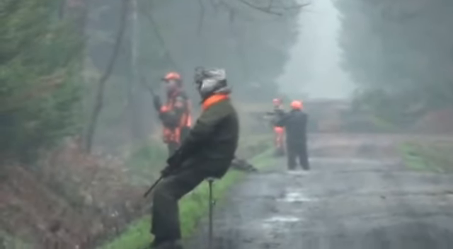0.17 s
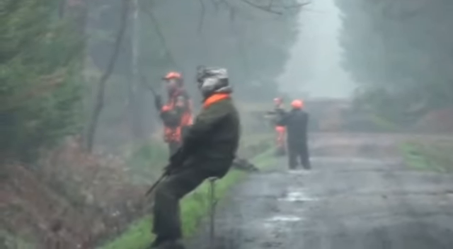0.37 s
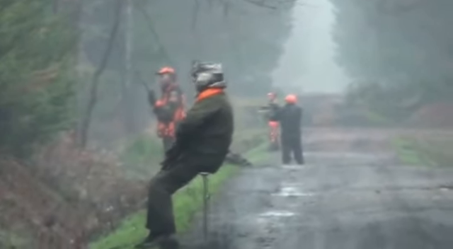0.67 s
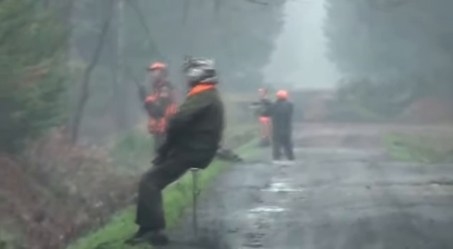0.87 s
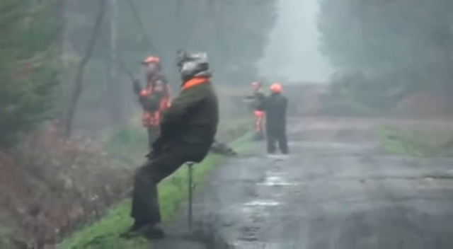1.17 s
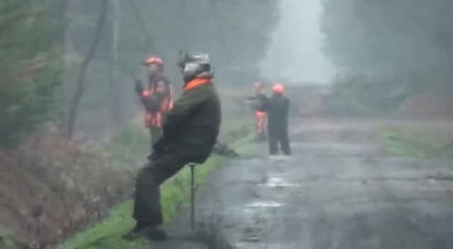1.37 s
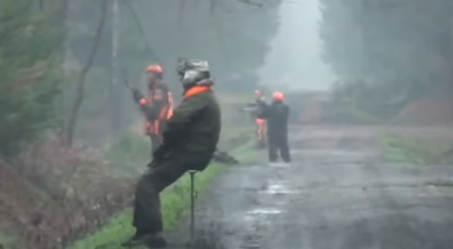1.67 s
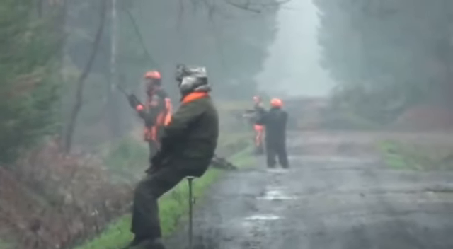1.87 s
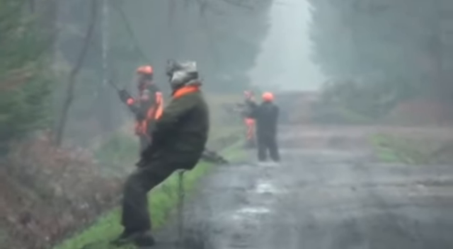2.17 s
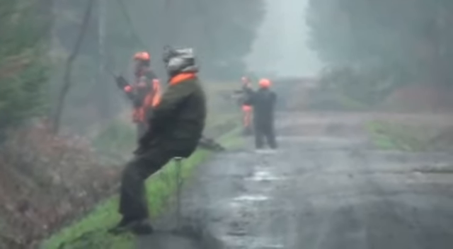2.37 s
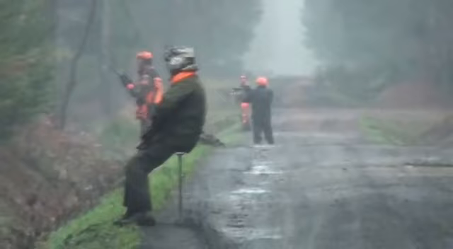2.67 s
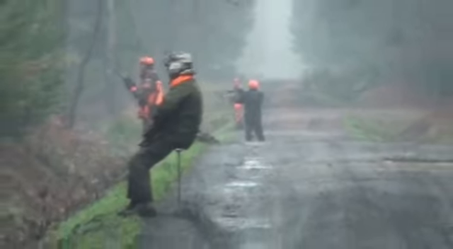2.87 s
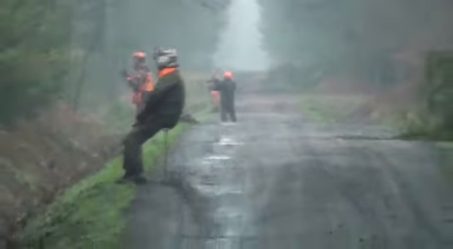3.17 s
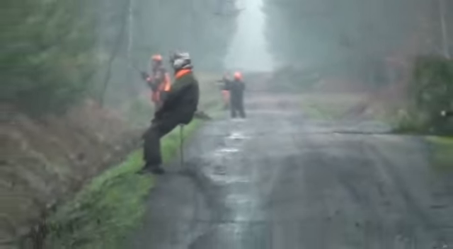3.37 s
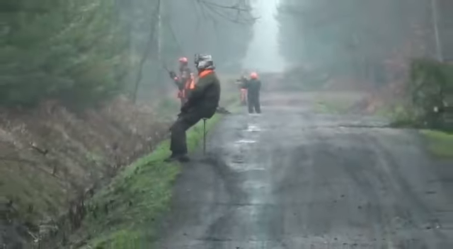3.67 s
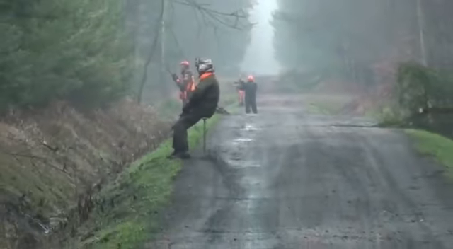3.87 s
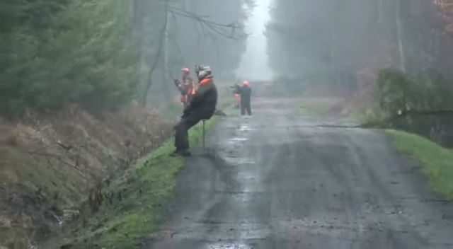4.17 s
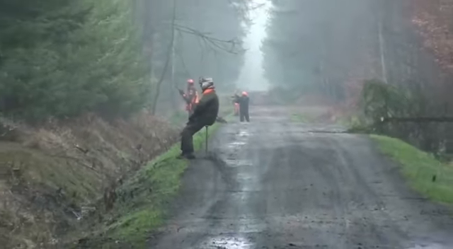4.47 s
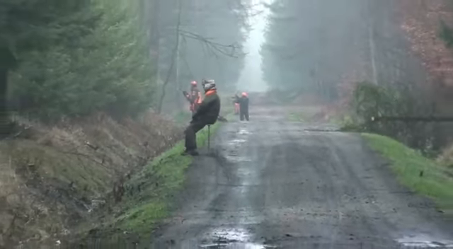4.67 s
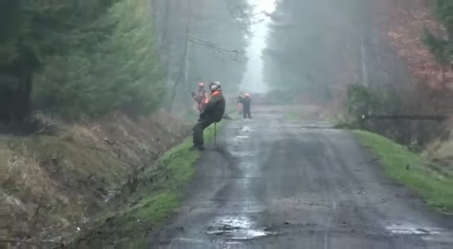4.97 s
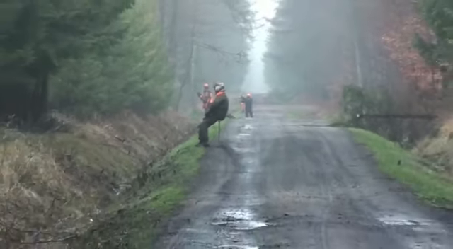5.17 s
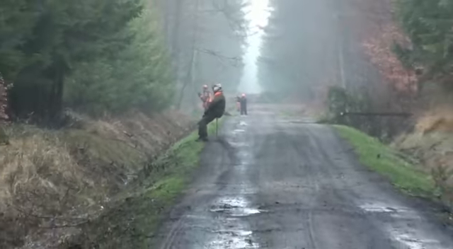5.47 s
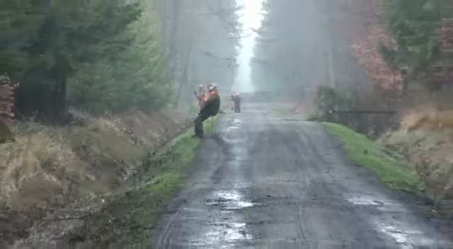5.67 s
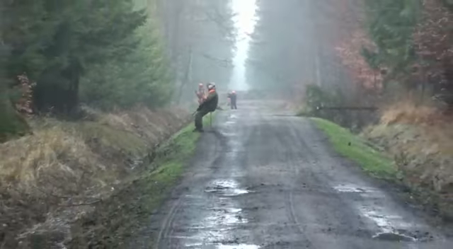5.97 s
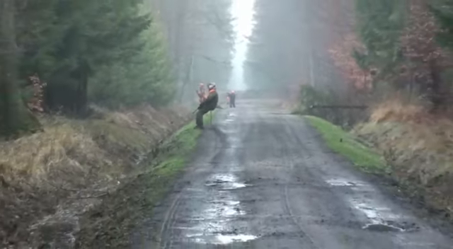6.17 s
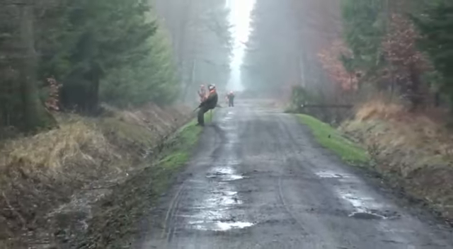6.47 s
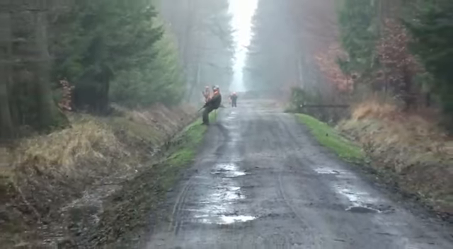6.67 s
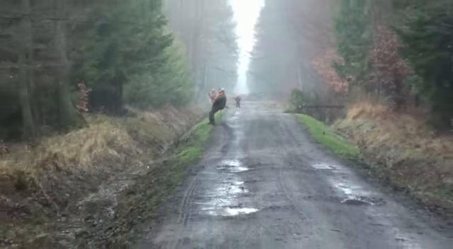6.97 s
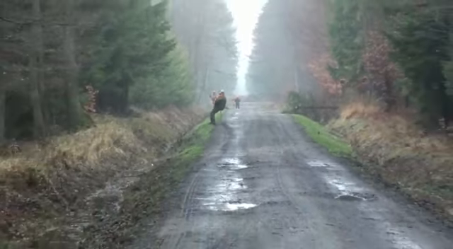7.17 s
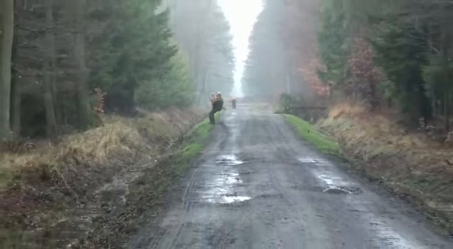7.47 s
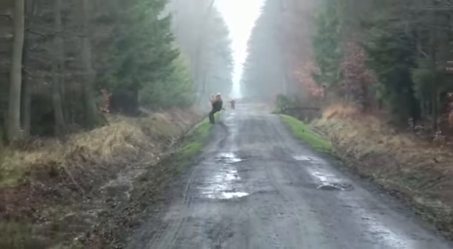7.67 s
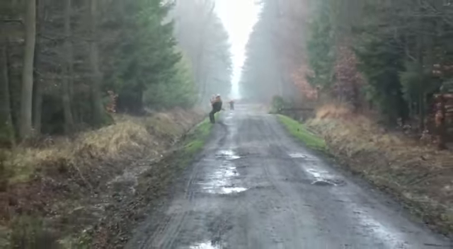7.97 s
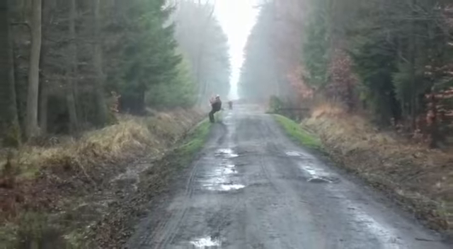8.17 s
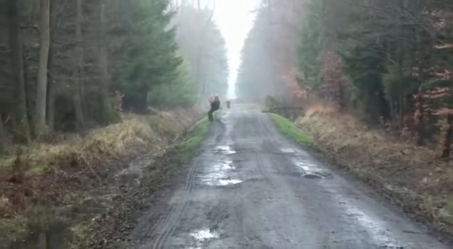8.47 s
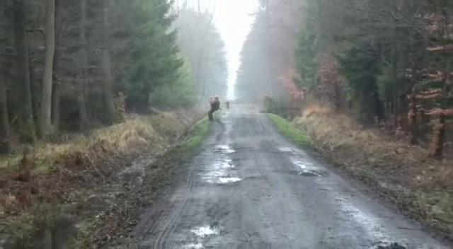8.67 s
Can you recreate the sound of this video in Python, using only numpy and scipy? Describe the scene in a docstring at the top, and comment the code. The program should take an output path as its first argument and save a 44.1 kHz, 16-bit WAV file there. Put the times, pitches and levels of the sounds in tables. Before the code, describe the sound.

A soft hush and low hum fill a forest track. Faint howls and bird cries carry from far off, while the camera's zoom motor whirrs, squeaks and ticks quietly right at the microphone. About two thirds of the way through, one loud gunshot cracks from down the track. It crashes brightly off the nearby trees, then rolls away in a long echo that grows duller as it fades.

```python
"""First comes the hush of a forest track in damp, still air, with a low hum and a camera's thin whine.
Faint howls and bird cries carry from afar while the camera's lens motors whirr, squeak and tick.
At 6.7 s one gunshot sounds some way down the track: a pressure jump with a steep shock front.
Nearby trees scatter it as a bright crash, then thousands of trunks return it as a long roll
that loses its treble by absorption in the air."""
import sys
import numpy as np
from scipy import signal
from scipy.fft import rfft, irfft, next_fast_len
from scipy.io import wavfile

SR = 44100
rng = np.random.default_rng(int(sys.argv[2]) if len(sys.argv) > 2 else 0)


def bounce(signal):
    """Save signal as a 16-bit WAV file at the path given by the first command-line argument."""
    frames = np.transpose(np.atleast_2d(signal))
    limited = np.clip(frames, -1, 1)
    pcm = np.round(limited * 32767).astype(np.int16)
    wavfile.write(sys.argv[1], SR, pcm)


N = 388521
T = np.arange(N) / SR
SHOT_S = 6.702


def undb(db):
    """Decibels to amplitude ratio."""
    return 10 ** (np.asarray(db) / 20)

def unit(x):
    """Normalisation to rms 1."""
    return x / np.sqrt(np.mean(x ** 2))

def at_hz(rows, hz, column=1):
    """Interpolation of a table column on a log-frequency axis."""
    rows = np.array(rows, float)
    return np.interp(np.log(np.maximum(hz, 1)), np.log(rows[:, 0]), rows[:, column])

def colour(x, rows):
    """Spectral shaping by (frequency [Hz], relative level [dB]) points, at rms 1."""
    size = next_fast_len(x.shape[-1], real=True)
    gain = undb(at_hz(rows, np.fft.rfftfreq(size, 1 / SR)))
    return unit(irfft(rfft(x, size) * gain, size)[..., :x.shape[-1]])

def band(x, lo_hz, hi_hz, order=2):
    """Causal band-pass filtering."""
    return signal.sosfilt(signal.butter(order, [lo_hz, hi_hz], "band", fs=SR, output="sos"), x + 1e-18)

def walk(per_s):
    """Random fluctuation: normal draws joined by straight lines."""
    return np.interp(T * per_s, np.arange(4096), rng.standard_normal(4096))

def gate(start_s, end_s, attack_s, release_s):
    """Trapezoidal envelope: rise, hold and fall."""
    return np.clip((T - start_s) / attack_s, 0, 1) * np.clip(1 - (T - end_s) / release_s, 0, 1)

def swell(s, half_s):
    """Bell-shaped envelope, 1 at time s."""
    return np.exp(-np.minimum(((T - s) / half_s) ** 2, 60))

def sine(hz, rms):
    """Frequency modulation: phase integrates pitch while the tone sounds."""
    out, on = np.zeros(N), rms > 0
    out[on] = np.sqrt(2) * np.sin(2 * np.pi * np.cumsum(hz[on]) / SR) * rms[on]
    return out

def ports(mid, side, side_db):
    """Mid-side stereo: two close microphone ports receive nearly the same pressure."""
    return mid + undb(side_db) * side * np.array([[1], [-1]])

def add(out, s, x):
    """Superposition of x on out from time s."""
    i = int(s * SR)
    out[i:i + len(x)] += x[:N - i]

def trunks(per_s):
    """Random scattering: echoes arrive from scattered trunks, each with its own strength."""
    return (rng.random(N) < per_s / SR) * rng.standard_normal(N)


def background(hush_db=-59, hiss_db=-61, after_db=3.5, rise_s=0.49):
    """Broadband noise with two soft rushes; the steady background is slightly louder after the shot."""
    # spectrum of the hush: (frequency [Hz], relative level [dB])
    hush_spectrum = [(20, -39), (45, 1), (70, 2.5), (120, 1), (250, 1), (500, 2), (800, 0), (1200, -2),
                     (1700, -5.5), (3600, -9), (6500, -10.5), (9000, -17), (15500, -40)]
    # soft rushes: (peak time [s], half length [s], level [dB], lift of the hush [dB])
    rushes = [(0, 0.23, -66, 1.1), (6.42, 0.46, -63.5, 2.5)]
    noise = rng.standard_normal((5, N))
    after = after_db * np.clip((T - SHOT_S) / rise_s, 0, 1)
    lift = sum(lift_db * swell(s, half_s) for s, half_s, _, lift_db in rushes)
    side = band(noise[1], 300, 6100, order=1)  # long waves reach both ports alike
    hush = colour(ports(noise[0], side, -1.8), hush_spectrum)
    hush *= undb(hush_db + lift + after + 0.5 * walk(4.92))
    hiss = ports(noise[2], noise[3], -26) * undb(hiss_db + after)
    rush_gain = sum(undb(db) * swell(s, half_s) for s, half_s, db, _ in rushes)
    return hush + hiss + unit(band(noise[4], 1017, 1250)) * rush_gain

def low_hum(hz=72, gain_db=-1.3):
    """Random modulation makes a low tone waver in pitch and level."""
    # envelope of the hum: (time [s], relative level [dB])
    hum_levels = [(0, -68.5), (.9, -69), (1.4, -64), (3.5, -63.5), (4.7, -63.5), (5.2, -74), (6.6, -68)]
    level_db = np.interp(T, *np.transpose(hum_levels))
    return sine(hz + 1.57 * walk(8), undb(gain_db + level_db + 2 * walk(12)))

def camera_whine():
    """Superposed pure tones form the camera's steady whine."""
    # partials: (frequency [Hz], level [dB])
    partials = [(842, -76.5), (2524.3, -67.5), (7499, -80)]
    return sum(np.sqrt(2) * undb(db) * np.sin(2 * np.pi * hz * T) for hz, db in partials)

def lens_motors(frame_hz=50, gear_turn_s=0.48, gear_peak_s=3.67, barrel_hz=5500, barrel_half_hz=460):
    """Forced vibration: the body whirrs; steppers sing at their step rate, lifted by barrel resonance."""
    # resonances of the camera body: (frequency [Hz], bandwidth [Hz], level [dB])
    body_modes = [(3830, 500, -75.5), (6470, 500, -82)]
    # motor runs: (start [s], end [s], first step rate [Hz], last step rate [Hz],
    # base level [dB], hunting depth [Hz])
    runs = [(2.6, 2.68, 5900, 5780, -74, 30), (2.69, 2.79, 4700, 4800, -66, 25),
            (2.82, 2.92, 5280, 5900, -68, 90), (2.92, 3.16, 5900, 7750, -73.5, 80),
            (3.16, 3.57, 8480, 8480, -71, 45), (3.65, 7.93, 5480, 5480, -70.5, 85),
            (7.94, 8.81, 3820, 3820, -60.5, 135)]
    frame_cycle = np.sin(2 * np.pi * frame_hz * T)
    frame_index = (T * frame_hz).astype(int)
    speed_reset = rng.standard_normal(1000)[frame_index]  # speed is reset on every picture frame
    hurrying = rng.random(1000)[frame_index] < 0.05  # on some frames the zoom hurries to catch up
    wobble_hz = 22 * speed_reset + 25 * walk(400)
    gear_hz = 50 * np.cos(2 * np.pi * (T - gear_peak_s) / gear_turn_s)  # one speed swing per turn
    throb_db = 2.2 * frame_cycle + 2 * walk(90)
    ragged_db = 4.5 * (np.clip(speed_reset, -2, 1) - 0.2)  # brief runs never settle
    out = np.zeros(N)
    for hz, width_hz, db in body_modes:
        whirr = band(rng.standard_normal(N), hz - width_hz / 2, hz + width_hz / 2, order=1)
        out += unit(whirr) * undb(db + throb_db)
    for start, end, first_hz, last_hz, db, hunt_hz in runs:
        long_zoom, brief = end - start > 1, end - start < 0.5
        step_hz = np.interp(T, [start, end], [first_hz, last_hz]) + (gear_hz + 197 * hurrying) * long_zoom
        barrel_db = 6 / (1 + ((step_hz - barrel_hz) / barrel_half_hz) ** 2)
        gain = undb(db + barrel_db + throb_db + ragged_db * brief) * gate(start, end, 0.0073, 0.0073)
        out += sine(step_hz + hunt_hz * np.tanh(3 * frame_cycle) + wobble_hz, gain)
    return out

def rustle(s=0.85, db=-65, half_s=0.11):
    """Amplitude-modulated noise gives a brief, faint rustle, as of a sleeve."""
    noise = unit(band(rng.standard_normal(N), 900, 4500, order=1))
    return noise * undb(db + 2 * walk(60)) * swell(s, half_s)

def far_calls(t60_s=7.9, sag_per_s=0.029):
    """Reverberation in the wood blurs howls and bird cries; hoarser calls flutter faster in pitch."""
    # animal calls: (start [s], length [s], pitch [Hz], relative level [dB], hoarseness [Hz])
    calls = [(1.13, 1, 591, -70, 20.8), (1.98, 0.16, 2230, -60.5, 95), (2.13, 0.22, 2075, -58.5, 90),
             (2.26, .18, 2520, -62, 350), (3.141, 0.34, 672, -69.5, 20), (3.6, 0.22, 1770, -67, 35),
             (4.665, .2, 1680, -70, 35)]
    voices = np.zeros(N)
    for s, length_s, hz, db, hoarse_hz in calls:
        pitch_hz = hz * (1 - sag_per_s * (T - s - length_s / 2))
        flutter_hz = hoarse_hz * walk(min(2.5 * hoarse_hz, 450))
        envelope = gate(s, s + length_s, attack_s=0.055, release_s=0.11)
        voices += sine(pitch_hz + flutter_hz, undb(db) * envelope)
    t = T[:4 * SR]
    responses = rng.standard_normal((2, len(t))) * undb(-60 * t / t60_s)
    mid, side = (signal.fftconvolve(voices, wood / np.linalg.norm(wood))[:N] for wood in responses)
    return undb(-3) * voices + undb(-0.5) * ports(mid, side, -8)

def lens_squeaks(scatter_hz=100, scatter_db=2.5, slur_hz_per_s=11000):
    """Linear chirps: the lens drive squeaks at irregular moments, each squeak slurring downward."""
    # spells of squeaking: (start [s], end [s], pitch [Hz], rate [1/s], typical peak level [dB])
    spells = [(1.4, 2.6, 6400, 5, -63), (3.9, 5.5, 3950, 15, -60.5), (3.7, 5.6, 4950, 9, -59.5),
              (6.0, 8.75, 5000, 15, -57.5)]
    out, t = np.zeros(N), T[:900]
    for start, end, hz, per_s, db in spells:
        for s, (late, high, loud) in zip(np.arange(start, end, 1 / per_s), rng.standard_normal((64, 3))):
            pitch_hz = hz + scatter_hz * high - slur_hz_per_s * (t - t.mean())
            squeak = np.hanning(len(t)) * np.sin(2 * np.pi * np.cumsum(pitch_hz) / SR)
            onset_s = np.clip(s + 0.5 * late / per_s, start, end)
            add(out, onset_s, undb(db + scatter_db * loud) * squeak)
    return out

def lens_ticks(decay_s=0.0026):
    """Damped transients: each tick in the lens is narrow-band noise that decays exponentially."""
    # ticks: (time [s], peak level [dB], frequency [Hz])
    ticks = [(2.5769, -41, 4690), (2.603, -47, 4960), (5.1126, -40.5, 7200)]
    out, t = np.zeros(N), T[:900]
    for s, db, hz in ticks:
        tick = band(rng.standard_normal(len(t)) * np.exp(-t / decay_s), hz * 0.8, hz * 1.06, order=1)
        add(out, s, tick * undb(db) / np.abs(tick).max())
    return out

def blasts(push_s=0.00045, sharp_s=0.0003, spread_s=0.0065, growth_s=0.076):
    """A blast wave is a pressure jump, then suction; multipath spreading smears its later echoes."""
    # the direct blast and its strong echoes: (time [s], peak level [dB], treble edge [Hz])
    arrivals = [(6.702, -1, 2600), (6.7037, -7.5, 2200), (6.7102, -5.5, 5000), (6.716, -6.5, 1470),
                (6.7491, -10, 4500), (6.763, -12, 3000), (6.971, -22.5, 263), (7.022, -16, 1500),
                (7.329, -12.5, 990), (7.368, -18, 1000), (7.612, -17, 706), (7.887, -27, 700),
                (8.572, -22.5, 1390)]
    out, t = np.zeros(N), T[:2048]
    wave = (1 - t / push_s) * np.exp(-t / push_s)
    for s, db, top_hz in arrivals:
        smear_s = sharp_s + spread_s * (1 - np.exp(-(s - SHOT_S) / growth_s))
        paths = 0.23 * rng.standard_normal(len(t)) * np.exp(-t / smear_s)
        paths[0] = 2  # the shortest path is the strongest
        pulse = band(np.convolve(wave, paths)[:len(t)], min(330, top_hz / 3), top_hz)
        pulse = band(pulse, 48, 7000, order=4)  # air absorbs the highest treble
        add(out, s, pulse * undb(db) / np.abs(pulse).max())
    return out

def crack(s=6.7021, gain_db=-29.5, decay_s=0.0014):
    """The steep shock front of the direct blast has a broad spectrum: one bright snap."""
    out, t = np.zeros(N), T[:200]
    snap = band(rng.standard_normal(len(t)), 2000, 14600, order=1) * np.exp(-t / decay_s)
    add(out, s, undb(gain_db) * snap)
    return out

def near_scatter(db=-18, t60_s=0.65, build_s=0.0021):
    """Early reflections from the trunks and twigs beside the track merge into a bright, dense crash."""
    # spectrum of the scatter: (frequency [Hz], relative level [dB])
    scatter_spectrum = [(30, -50), (110, 2.5), (250, -5), (550, -1), (1000, 0.5), (2000, 2.5), (3200, -2.5),
                        (5200, -12.5), (7200, -15.5), (10000, -36), (15000, -61)]
    age = np.maximum(T - SHOT_S, 0)
    mid, side = (colour(trunks(20000), scatter_spectrum) for _ in range(2))
    crash = ports(mid, band(side, 400, 15000, order=1), -15)
    return crash * undb(db - 60 * age / t60_s) * (1 - np.exp(-age / build_s))

def roll(gain_db=-19.5, build_s=0.018, hold_s=0.77, bend_s=0.19, fade_db_per_s=9.5):
    """Absorption by air and soft ground: later echoes travel further, each band fading at its own rate."""
    # forest echoes: (frequency [Hz], initial relative level [dB], extra loss [dB/s])
    forest = [(30, -46, 0), (69, -16, 7.5), (110, -15.5, 9.5), (160, -13.5, 4.5), (218, -15, -0.5),
              (334, -6, 1), (530, 1.5, -0.1), (680, -0.5, 1.4), (910, -4.5, 3), (1870, -7.5, 6.5),
              (3130, -12, 15.5), (5080, -23, 21.5), (7260, -33.5, 40), (10000, -62, 40), (15000, -75, 40)]
    size = 2 ** 17
    age, hz = T[:size], np.maximum(np.fft.rfftfreq(size, 1 / SR), 1)
    echoes = np.array([colour(trunks(15000)[:size], forest) for _ in range(2)])
    midrange_rms = band(echoes[0], 300, 1000, order=4).std()
    spectra = rfft(echoes / midrange_rms)
    out = np.zeros((2, size))
    for centre_hz in 2 ** np.arange(5, 14.5, 0.5):
        half_octave = np.maximum(1 - 2 * np.abs(np.log2(hz / centre_hz)), 0)
        mid, side = irfft(spectra * half_octave)
        side_db = at_hz([(100, -42), (500, -18), (4000, -12)], centre_hz)
        lean_db = (170 < centre_hz < 800) * np.array([[-0.5], [0.5]])  # the roll's body lies to the right
        loss_db = at_hz(forest, centre_hz, column=2) * age
        out += ports(mid, side, side_db) * undb(lean_db - loss_db)
    # the roll holds its level for a while, then bends into a steady fade
    fade_db = fade_db_per_s * bend_s * np.logaddexp(0, (age - hold_s) / bend_s)
    stands_db = 0.5 * walk(30)[:size]  # thick and thin stands of trees
    out *= undb(gain_db - fade_db + stands_db) * (1 - np.exp(-age / build_s))
    return np.pad(out, ((0, 0), (int(SHOT_S * SR), 0)))[:, :N]

def scene():
    """Superposition of the quiet wood, the camera's noises and the shot with its echoes."""
    quiet = background() + low_hum() + camera_whine() + lens_motors() + rustle() + far_calls()
    return quiet + lens_squeaks() + lens_ticks() + blasts() + crack() + near_scatter() + roll()

def record(dry):
    """Soft saturation flattens only the highest peaks; a steep low-pass limits the bandwidth."""
    ceiling, top_hz = 0.78, 15800
    rounded = dry / (1 + (dry / ceiling) ** 8) ** (1 / 8)
    return signal.sosfilt(signal.ellip(8, 0.2, 70, top_hz, fs=SR, output="sos"), rounded)


dry = scene()
out = record(dry)
bounce(out)
```